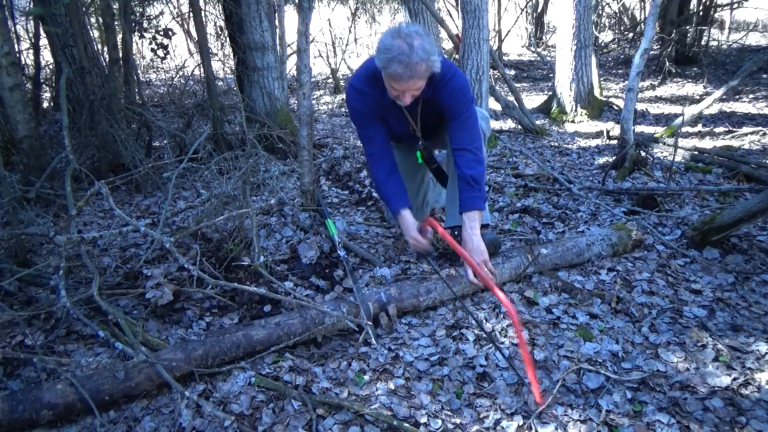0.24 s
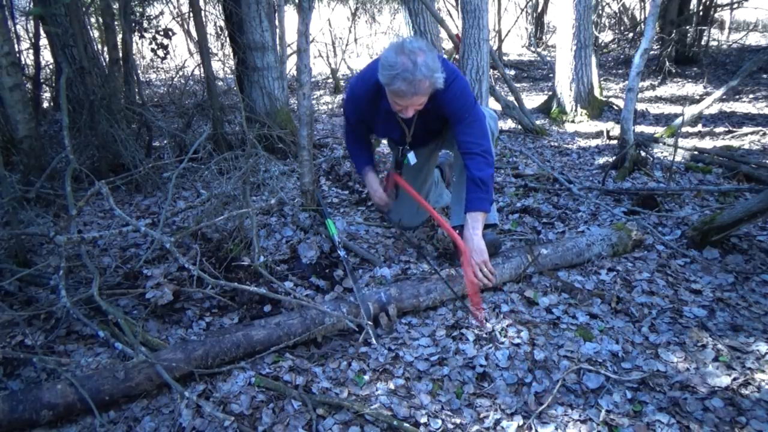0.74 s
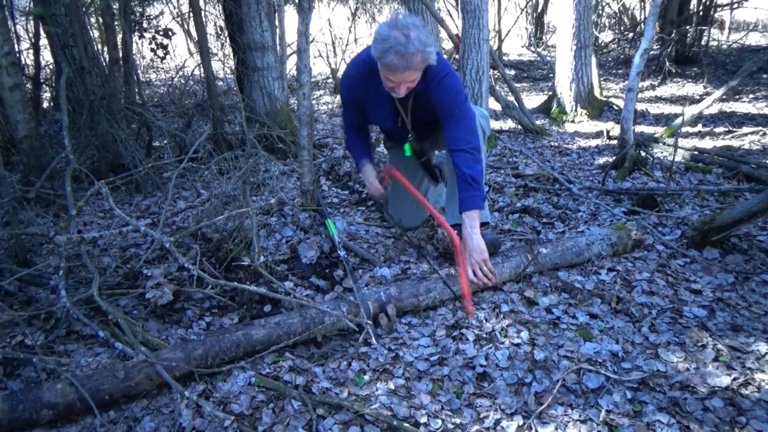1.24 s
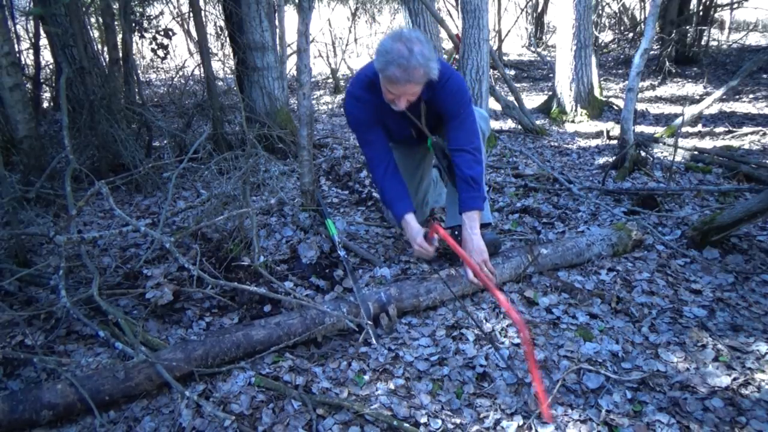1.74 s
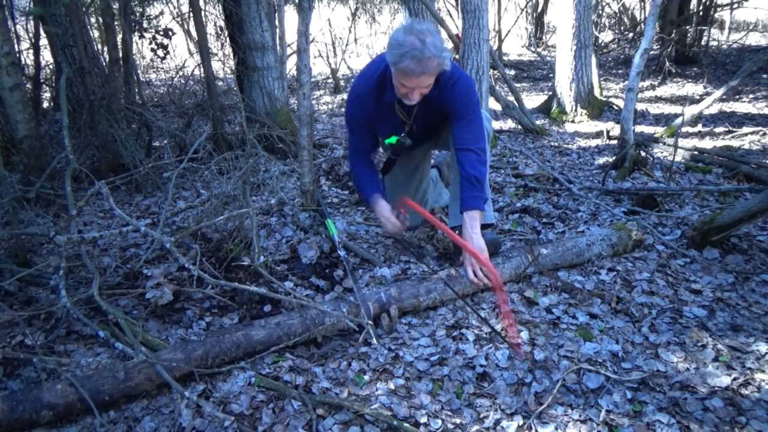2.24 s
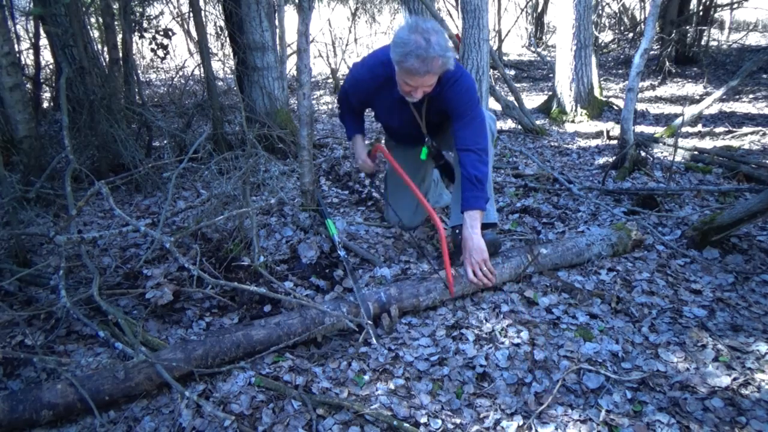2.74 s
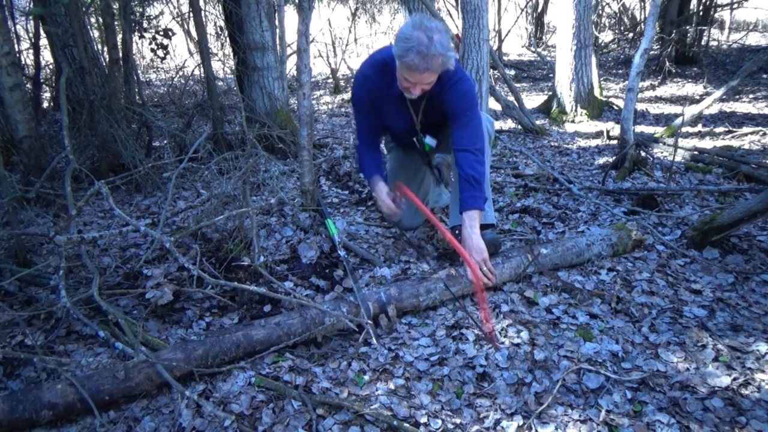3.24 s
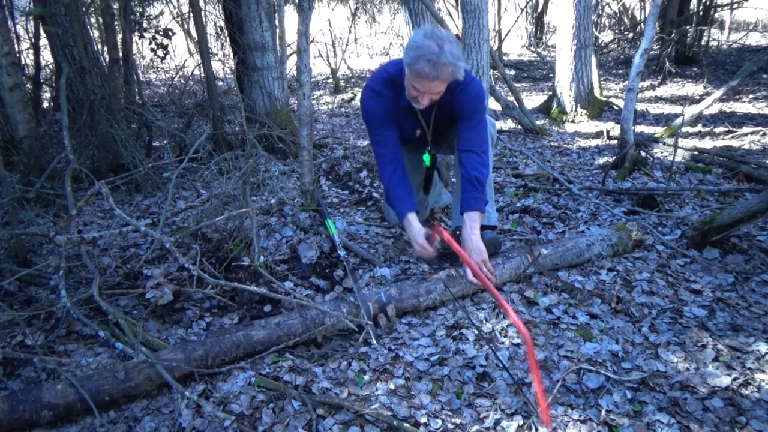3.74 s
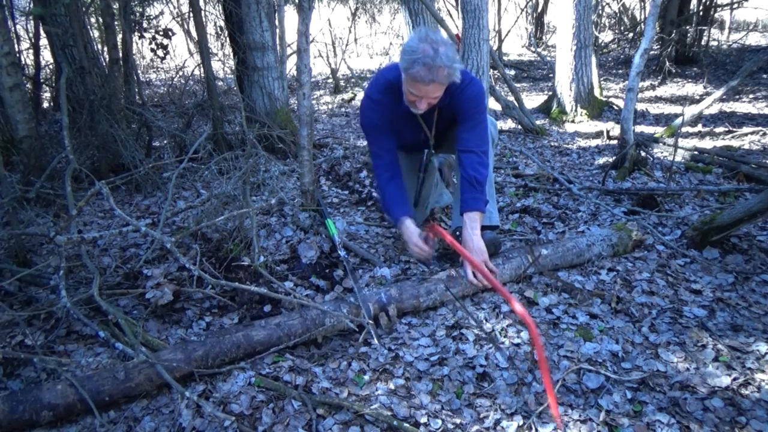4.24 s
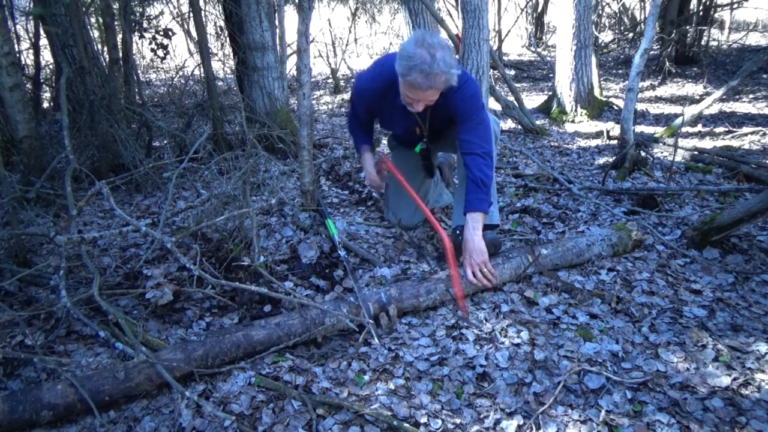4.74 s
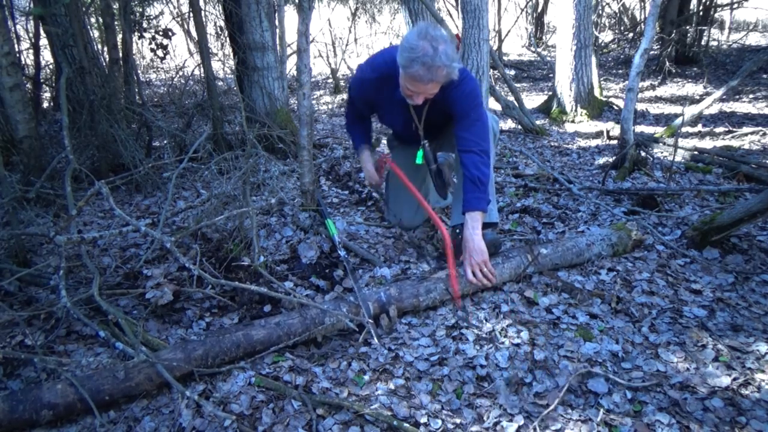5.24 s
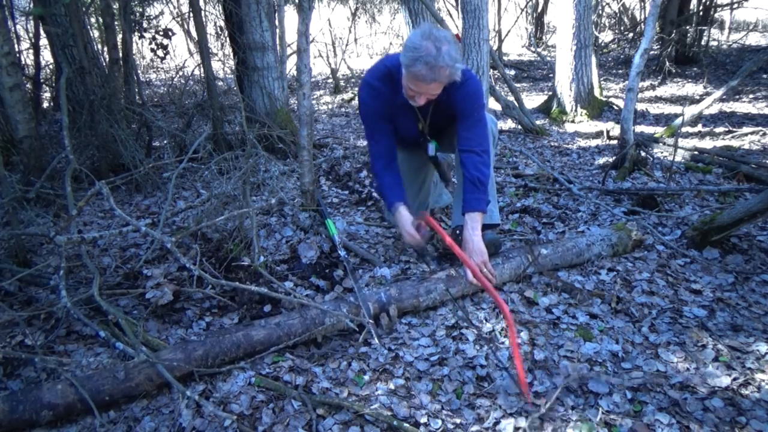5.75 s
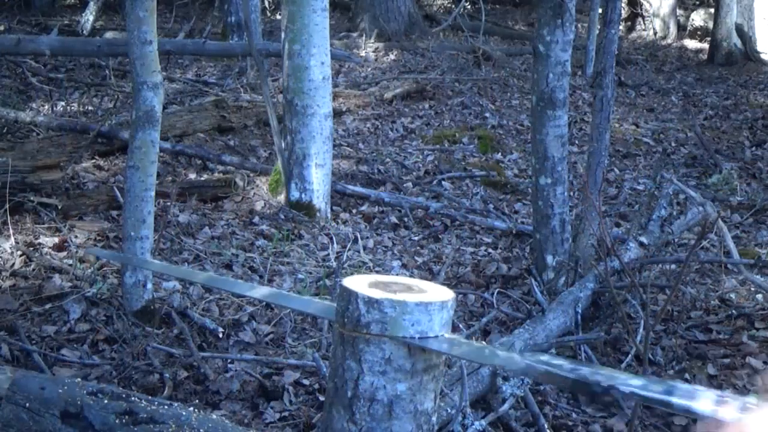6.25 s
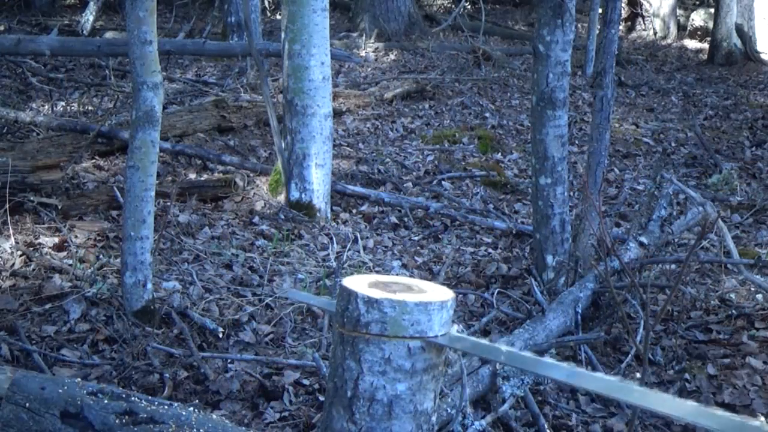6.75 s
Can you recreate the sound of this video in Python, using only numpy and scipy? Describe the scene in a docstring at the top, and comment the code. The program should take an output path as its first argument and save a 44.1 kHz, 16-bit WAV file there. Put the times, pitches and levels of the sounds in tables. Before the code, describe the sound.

Steady raspy sawing of a fallen log outdoors, about three strokes a second, with ringing blade and woody drone, ending on a wide hand saw.

```python
"""Bow saw and hand saw in the woods

On the forest floor a bow saw rasps back and forth through a log: its teeth tear fibres, the log drones
at the tooth rate and the thin blade rings, judders on the way back and snags at the turns.
Near the end it dissolves into a closer, brighter hand saw in a stump. Each body filters noise and tooth beats;
a faint forest hush lies under both, and now and then a blade mode squeals."""
import sys
import numpy as np
from scipy import signal
from scipy.fft import rfft, irfft, next_fast_len
from scipy.io import wavfile
from scipy.ndimage import uniform_filter1d, map_coordinates

SR = 44100
rng = np.random.default_rng(int(sys.argv[2]) if len(sys.argv) > 2 else 0)


def unload_audio(sound):
    """Save the sound as a 16-bit wav file, at the path given as the first command line argument."""
    columns = np.transpose(np.atleast_2d(sound))
    # keep every value between -1 and 1, then stretch to whole-number steps
    steps = np.round(np.clip(columns, -1, 1) * 32767)
    wavfile.write(sys.argv[1], SR, steps.astype(np.int16))


N = 307818  # length in samples
TIME = np.arange(N) / SR  # s
TOP_HZ = 15900  # upper limit of the microphone channel

# Forest hush, relative colour: f/Hz, level/dB per Hz
AIR_COLOUR = [(20, -7.5), (50, -10), (110, 0), (250, -2.5), (600, -10.5), (2000, -18), (8000, -32),
              (16000, -26)]
# Decay of the scatter off trunks and ground: f/Hz, t60/s
WOODS_DECAY = [(100, 0.14), (800, 0.19), (4000, 0.36), (14000, 0.18)]

# Dissolve from bow saw to hand saw: from t/s, to t/s
DISSOLVE = (6.155, 6.27)
# The blade catches and jerks on: centre t/s, swell/dB (negative is a stall), half width/s
JUDDER = [(.525, 3, .007), (1.366, 3, .004), (1.875, 3.5, .016), (1.945, 3.5, 0.011), (1.99, 4.5, 0.0092),
          (2.03, 1.5, .011), (2.611, 2, 0.012), (3.24, 4.5, .012), (3.875, 5, .014), (3.935, 2.5, .014),
          (3.98, 4.5, .009), (4.02, 0.5, .011), (4.525, 4, 0.014), (4.595, 4.5, .013), (4.62, -3.5, .005),
          (4.635, 5, 0.0098), (4.663, 4, 0.0059), (5.167, 3.5, .017), (5.222, 3, .011), (5.268, 2, 0.0074),
          (5.289, -7, 0.0063), (5.32, 4, .009), (5.346, 4, .004), (5.82, 2.5, .013), (5.885, 3.5, 0.017),
          (5.925, 4.5, 0.0095), (6.23, -5.5, 0.0056), (6.31, -5.5, .007), (6.336, -3.5, .005),
          (6.56, -1.5, 0.0063)]
# A blade mode sings briefly: centre t/s, f/Hz, level/dB before trim, half width/s
SQUEALS = [(.04, 6900, -28, 0.061), (1.601, 6800, -39, .04), (3.022, 6850, -27, .006),
           (3.1, 7090, -32, 0.01), (4.94, 3200, -23, 0.011), (5.55, 6780, -30, 0.041),
           (6.259, 4310, -30, 0.038), (6.261, 3000, -35, .02), (6.45, 3000, -30, 0.023),
           (6.51, 3410, -29, 0.027), (6.919, 3380, -40, 0.034)]

# Hand saw, one row per stroke, each until the next row: start t/s, top tooth rate f/Hz, # thrum level/dB, blade
# level/dB before trim, blade level/dB before trim at the turn where the stroke begins
HAND_STROKES = [(6.1, 500, -47, -17, -36), (6.734, 490, -42, -18, -39), (7.17, 490, -46, -17.5, -39)]
# Swell of a stroke, one row for the push and one for the pull (same columns in all three swings):
# crest/share of the stroke, rise power, fall power; a higher power gives a flatter top
HAND_SWING = [(0.58, 4.1, 6.8), (.5, 3, 3)]
# Splinters snapping in the stump's cut: t/s, level/dB before trim
SPLINTERS = [(6.7208, -10), (6.7446, -14), (6.7517, -10.5), (6.758, -11), (6.774, -8)]
# Stump and hand saw, relative colour: f/Hz, level/dB per Hz
STUMP_COLOUR = [(60, -47), (300, -23.5), (800, -24), (1000, -22.5), (1450, -11.5), (2400, -12.5),
                (4000, -9.5), (6000, -5), (8600, -1.5), (9500, 1), (11200, -1.5), (13000, -10),
                (16000, -19)]
# Resonances standing on that colour: f/Hz, width/Hz, lift/dB
HAND_SAW_MODES = [(985, 57, 17.4), (1544, 91, 5.5), (2024, 66, 9.4), (3010, 58, 12.6), (3350, 120, 8.1),
                  (4360, 200, 4), (6140, 160, 4.9), (6960, 170, 6.9), (9530, 320, 2.7)]
# Rattle of the wobbling free blade, relative colour: f/Hz, level/dB per Hz
RATTLE_COLOUR = [(30, -35), (75, -10), (105, -7), (140, -4), (190, -11), (240, -18), (320, -9), (400, -25),
                 (1000, -53)]
# Scatter at the stump that differs between the ears: f/Hz, side over mid level/dB
STUMP_WIDTH = [(150, -41), (500, -16), (1000, -15), (1550, -30), (2000, -17), (4000, -21), (9000, -15.5),
               (14000, -34)]
# Place of the stump between the ears: f/Hz, side over mid gain (+ is left)
STUMP_LEAN = [(150, 0), (1000, -.03), (9000, -0.019)]

# Bow saw, one row per stroke, each until the next row: start t/s, top tooth rate f/Hz, log level/dB, # blade
# level/dB, blade level/dB at the turn where the stroke begins (levels before trim), crest lateness/share of the
# stroke
STROKES = [(-0.23, 441.4, -24, -20, -41.0, 0.023), (0.225, 390.0, -24.5, -22, -43.5, -0.04),
           (0.656, 497, -24, -17.5, -57.5, 0.046), (1.059, 412.0, -23.5, -19.5, -44.5, -0.032),
           (1.426, 481, -22.5, -17, -49.5, -0.038), (1.798, 488, -28, -20.0, -38, -0.014),
           (2.131, 469.0, -23.5, -16.5, -42, 0.0075), (2.49, 385.0, -26, -19.0, -39, 0.0048),
           (2.815, 599, -23.5, -15.5, -46, 0.1), (3.131, 510, -25.5, -18.5, -39, 0.044),
           (3.453, 653, -24.0, -16.0, -43, 0.048), (3.76, 512, -25.5, -19.5, -40, 0.044),
           (4.091, 584.0, -21.5, -16.5, -41.5, -0.05), (4.431, 548, -24.5, -20.5, -34, 0.033),
           (4.739, 564, -23, -17, -39, -0.04), (5.083, 567.4, -25, -20, -29.5, -0.14),
           (5.385, 531, -21.5, -17.5, -40.5, -0.095), (5.748, 491, -25, -20.5, -31, 0.028),
           (6.026, 500.0, -27.5, -23.5, -30, -0.0082), (6.38, 500.0, -25.0, -23.0, -33.0, 0.0)]
# Swell of the log and of the blade, push then pull: crest/share, rise power, fall power
LOG_SWING = [(0.7, 3.07, 1.04), (.45, 2.18, 4.74)]
BLADE_SWING = [(.54, 2.54, 1.9), (.59, 2.44, 4)]
# The teeth bite evenly and the log drones: t/s, drone gain/dB before blending, half width/s, overtone lift/dB
BITES = [(.07, 1, 0.027, 0.5), (.925, 5.5, 0.022, 0), (1.56, -5, 0.012, -6), (1.655, -1, 0.017, 3),
         (2.33, -11, 0.035, 2.5), (2.62, -6, 0.014, -5), (3.0, -2, 0.02, -1.5), (3.659, -4.5, .018, 7),
         (4.251, -5, 0.018, 0), (4.92, -2.5, 0.022, -4.5), (5.27, -5, 0.0098, 0), (5.57, -7.5, 0.011, 2),
         (5.93, -8, 0.0066, 0), (6.2, -11, 0.017, -4)]
# Partials of the unevenly set teeth: multiple of the tooth rate, level/dB before the overtone lift
TOOTH_PARTIALS = [(1, 3), (1.85, -1), (2.8, -8), (3.7, -8)]
# Log, relative colour: f/Hz, level/dB per Hz
LOG_COLOUR = [(41, -44), (70, -26), (130, -14.5), (228, -5), (265, -10), (399, -3.5), (478, -3.5),
              (677, -3.5), (811, -1), (1030, 1.5), (1240, -3.5), (1550, 0.8), (2100, -3), (2600, -8),
              (3380, -37), (5720, -120)]
# Resonances of the log while fibres tear: f/Hz, width/Hz, lift/dB
LOG_MODES = [(234, 23, 3.5), (274.7, 40, -13), (410, 37, 6.5), (485, 40, 1.5), (566, 12, 7.5),
             (618, 22, 6.5), (666, 48, 8), (754, 26, 3), (1012, 12, 6.5), (1180, 70, 2.5), (1333, 57, 7.5),
             (1490, 170, 3)]
# Resonances of the log as it bends: f/Hz, width/Hz, lift/dB
LOG_BENDING = [(410, 340, 2.9), (667, 75, 7.1), (1520, 240, 1.6)]
# The log booms less as the cut deepens: t/s, bass level/dB
BOOM = [(0, 2), (1.3, 3), (2.5, 0.6), (3.6, -2.5), (6.2, -3.5)]
# Bow saw blade, relative colour: f/Hz, level/dB per Hz
BLADE_COLOUR = [(1410, -24.5), (2400, -7), (2640, -8), (3170, -2.5), (3430, -5.5), (5570, -1.5), (6320, -2),
                (6900, -4), (8350, -4), (9480, 1.5), (12400, -8), (15100, -18.5), (16000, -20)]
# Resonances standing on that colour: f/Hz, width/Hz, lift/dB
BLADE_MODES = [(3147, 35, 2.8), (3910, 540, 4.1), (4780, 140, 4.1), (5600, 210, 3.2), (6760, 92, 9.7),
               (7000, 68, 9.1), (7260, 200, 1.8), (7660, 126, 6.7), (9240, 400, 1.2)]
# The deeper cut also damps the blade: t/s, treble level/dB
SHEEN = [(0, 2.5), (2.3, -0.4), (3.8, -0.8), (4.5, -2), (6.2, -0.8)]
# A tooth snags as the saw turns: t/s, scrape level/dB, length/s, ring f/Hz
SNAGS = [(.712, -34.5, .014, 9400), (1.724, -17, 0.0029, 10500), (1.731, -24, 0.0065, 3030),
         (1.757, -18.5, 0.0017, 3620), (1.772, -27, 0.011, 9750), (2.463, -22.5, 0.0043, 2380),
         (2.849, -29.5, 0.01, 9300), (3.194, -40, 0.0092, 3080), (3.413, -21.5, 0.0061, 6820),
         (3.751, -31.5, .009, 9380), (3.786, -31.5, 0.0085, 9400), (4.113, -32, 0.0078, 6940),
         (4.377, -27, 0.0035, 9500), (4.385, -21, .012, 10200), (4.429, -31, 0.0077, 9500),
         (5.027, -20.5, 0.016, 9460), (5.422, -25.5, 0.0076, 6850), (5.672, -21, 0.025, 9530)]
# Scatter at the log that differs between the ears: f/Hz, side over mid level/dB
LOG_WIDTH = [(150, -29), (300, -16), (700, -14), (1000, -14), (1700, -21.5), (3000, -18.5), (3800, -50),
             (6000, -69), (8200, -19), (11000, -55)]
# Place of the log between the ears: f/Hz, side over mid gain (+ is left)
LOG_LEAN = [(150, 0.0071), (300, 0.076), (700, 0.11), (1200, 0.069), (2200, -0.031), (4000, 0), (12000, 0)]

DWELL = 0.02  # share of a stroke for which the saw lingers at either end
THRUM_REST_DB = -51  # the free end of the hand saw at a turn
THRUM_HZ, THRUM_SETTLE_S = 100, 0.1107  # settled pitch, time constant
THRUM_SAG = 0.35  # a stroke starts this share above the settled pitch
LOG_REST_DB = -62  # at a turn the log sinks halfway from the blade's level to this
STEADY_BITE_DB = -19  # drone gain that runs through every stroke, before blending
SLOW_BLADE_DB = -5  # shelf on the lower blade modes as the saw slows to a stop


def amp(db):
    """Decibels to gain."""
    return 10 ** (np.asarray(db) / 20)


def unit(x):
    """Scale to rms 1."""
    return x / np.sqrt(np.mean(x ** 2) + 1e-20)


def along(points, hz):
    """(Hz, value) points read on a log axis."""
    f, value = np.transpose(points)
    return np.interp(np.log(hz + 1), np.log(f + 1), value)


def curves(rows):
    """One value per sample for each column after the time."""
    s, *columns = np.transpose(rows)
    return [np.interp(TIME, s, column) for column in columns]


def wobble(rate):
    """A random curve joining unit-variance knots smoothly, rate knots a second."""
    knots = rng.standard_normal(int(N * rate / SR) + 4)
    return map_coordinates(knots, [TIME * rate / SR])


def swell(s, width):
    """A bell-shaped gain around time s."""
    return np.exp(-np.minimum(((TIME - s) / width) ** 2 / 2, 20))


def shelf(x, db, edge_hz, side):
    """Raise or lower what lies on the low or the high side of the edge."""
    sos = signal.butter(2, edge_hz, side, fs=SR, output="sos")
    part = signal.sosfiltfilt(sos, x)
    return x + (amp(db) - 1) * part


def body(x, spectrum, modes, size=8192):
    """Pass x through the causal, minimum-phase ring of a body with this colour and these resonances."""
    hz = np.fft.rfftfreq(size, 1 / SR)
    # each resonance is a rounded bump on the broad colour
    bumps = sum(lift / (1 + (2 * (hz - f) / width) ** 2) for f, width, lift in modes)
    db = along(spectrum, hz) + bumps
    # folding the cepstrum onto positive times makes the ring causal
    cepstrum = irfft(np.log(amp(db) + 1e-6))
    cepstrum[1:size // 2] *= 2
    cepstrum[size // 2 + 1:] = 0
    ring = irfft(np.exp(rfft(cepstrum)))
    return signal.fftconvolve(x, ring / np.linalg.norm(ring))[:N]


def woods(x, size=256):
    """Two independent scatters from trunks and ground: noise tails that decay at their own rate per band."""
    hz, t, z = signal.stft(rng.standard_normal((2, SR // 3)), SR, nperseg=size)
    decay = amp(-60 * t / along(WOODS_DECAY, hz)[:, None])
    tail = signal.istft(z * decay, SR, nperseg=size)[1]
    return signal.fftconvolve(x[None], tail / np.linalg.norm(tail[0]), axes=1)[:, :N]


def air():
    """The faint, steady hush of the forest: coloured noise and its scatter at each ear."""
    hush = body(rng.standard_normal(N), AIR_COLOUR, []) * amp(1.2 * wobble(5))
    return amp(-48.5) * (hush + amp(-16.5) * woods(hush))


def placed(x, width, lean, wet_db):
    """Stereo image: the source leans by band and its reflections differ between the ears."""
    scatter = woods(x)
    m = next_fast_len(N + SR // 2)
    hz = np.fft.rfftfreq(m, 1 / SR)
    direct_side = rfft(x, m) * along(lean, hz)
    scatter_side = rfft(scatter[0], m) * amp(along(width, hz))
    side = irfft(direct_side + scatter_side, m)[:N]
    mid = x + amp(wet_db) * scatter[1]
    return np.array([mid + side, mid - side])


def position(strokes):
    """For each sample: which stroke is under way, and the share of it that is done."""
    start = np.transpose(strokes)[0]
    progress = np.interp(TIME, start, np.arange(len(start)))
    return progress.astype(int), progress % 1


def teeth(strokes, slip):
    """Count of teeth passed and blade speed 0-1; the arm swings like a pendulum."""
    stroke, done = position(strokes)
    speed = np.sin(np.pi * done ** .85)  # quick to start, slower to stop
    rate = np.transpose(strokes)[1][stroke] * speed * (1 + slip * wobble(273))
    return np.cumsum(rate) / SR, speed


def effort(strokes, swing, crest_db, turn_db, late=0):
    """Level in dB: every stroke lingers at its turn, climbs to a crest and sinks to the next turn."""
    stroke, done = position(strokes)
    crest, rise, fall = np.array(swing)[np.arange(len(strokes)) % 2].T  # push and pull alternate
    crest = np.clip(crest + late, .15, .85)[stroke]
    before = np.clip((crest - done) / (crest - DWELL), 0, 1) ** rise[stroke]
    after = np.clip((done - crest) / (1 - DWELL - crest), 0, 1) ** fall[stroke]
    turn_db = np.broadcast_to(turn_db, len(strokes))
    next_turn_db = np.roll(turn_db, -1)
    at_crest = crest_db[stroke] * (1 - before - after)
    return at_crest + turn_db[stroke] * before + next_turn_db[stroke] * after


def fibres(passed, speed, density, spread_db, gating, dust):
    """Tiny breaks, denser at speed, over a hiss of dust; both swell as each tooth enters."""
    chance = density * (.06 + speed) / SR
    breaks = (rng.random(N) < chance) * rng.choice([-1, 1], N)
    breaks = breaks * amp(spread_db * rng.standard_normal(N))
    tear = unit(breaks / np.sqrt(chance)) + dust * rng.standard_normal(N)
    return unit(tear * np.exp(gating * np.cos(2 * np.pi * passed)))


def patchy(x, depth_db, size=1024):
    """The contact shifts along the blade, so narrow bands come and go."""
    z = signal.stft(x, nperseg=size)[2]
    field = uniform_filter1d(rng.standard_normal(z.shape), size=3, axis=0)  # across frequency
    field = uniform_filter1d(field, size=5, axis=1)  # across time
    return unit(signal.istft(z * amp(depth_db * unit(field)), nperseg=size)[1][:N])


def judder():
    """Gain in dB as the blade catches: each jerk is a swell with a stall on either side, or the reverse."""
    gain_db = np.zeros(N)
    for s, swell_db, width in JUDDER:
        near = np.abs(TIME - s) < .08
        u = ((TIME[near] - s) / width) ** 2
        gain_db[near] += swell_db * (1 - u) * np.exp(-u / 2)
    return gain_db


def tone(hz, waver_hz, count):
    """A mode of rms 1 whose pitch wavers under the rubbing."""
    drift = unit(uniform_filter1d(rng.standard_normal(count), size=120))
    return np.sqrt(2) * np.sin(2 * np.pi * np.cumsum(hz + waver_hz * drift) / SR)


def squeals():
    """Friction locks onto one blade mode, then loses it: a wavering tone in a bell-shaped swell."""
    out = np.zeros(N)
    for s, hz, db, width in SQUEALS:
        near = np.abs(TIME - s) < .15
        out[near] += amp(db - 0.5) * swell(s, width)[near] * tone(hz, 45.4, count=near.sum())
    return out


def splinters(t60):
    """Sharp cracks that die at once: noise with an exponential decay."""
    out, t = np.zeros(N + SR), np.arange(SR // 16) / SR
    for s, db in SPLINTERS:
        out[round(s * SR):][:len(t)] += amp(db - 60 * t / t60) * rng.standard_normal(len(t))
    return out[:N]


def thrum(crest_db, waver, rattle_db):
    """The free end of the hand saw wobbles: a low, wavering note that sags after each turn, and a rattle."""
    stroke, _ = position(HAND_STROKES)
    age = np.maximum(TIME - np.transpose(HAND_STROKES)[0][stroke], 0)
    sag = 1 + THRUM_SAG * np.exp(-age / THRUM_SETTLE_S)
    hz = THRUM_HZ * sag * (1 + waver * wobble(25))
    note = amp(2.5 * wobble(20)) * np.sin(2 * np.pi * np.cumsum(hz) / SR)
    rattle = amp(rattle_db) * unit(body(rng.standard_normal(N), RATTLE_COLOUR, []))
    return amp(effort(HAND_STROKES, HAND_SWING, crest_db, THRUM_REST_DB)) * (note + rattle)


def hand_saw(jerk_db):
    """A wide, free blade close by flutters in the cut, wobbles and rings in a few clear modes."""
    passed, speed = teeth(HAND_STROKES, slip=.05)
    _, _, thrum_db, crest_db, turn_db = np.transpose(HAND_STROKES)
    blade_db = effort(HAND_STROKES, HAND_SWING, crest_db, turn_db)
    flutter_hz = 28 * (1 + 0.26 * wobble(14))
    flutter = np.sin(2 * np.pi * np.cumsum(flutter_hz) / SR)
    tear = fibres(passed, speed, density=5000, spread_db=2.5, gating=0.21, dust=0.93)
    rasp = patchy(tear, depth_db=2.0)
    drive = rasp * amp(blade_db + jerk_db + 1.26 * flutter + 0.5)
    drive = drive + amp(-8.0) * splinters(t60=0.0068)
    drone = amp(-44.5) * swell(6.94, 0.067) * np.sin(2 * np.pi * passed)  # the teeth bite on the second stroke
    low = thrum(thrum_db, waver=.07, rattle_db=-1) + drone
    return placed(body(drive, STUMP_COLOUR, HAND_SAW_MODES) + low, STUMP_WIDTH, STUMP_LEAN, wet_db=-29)


def snags(ring_db):
    """Each snag scrapes for a moment, rings one mode and lets go."""
    out, t = np.zeros(N + SR), np.arange(SR // 16) / SR
    for s, db, length, hz in SNAGS:
        grip = (1 - np.exp(-t / 0.00013)) * np.exp(-(t / length) ** 3)
        scrape = unit(body(rng.standard_normal(len(t)), BLADE_COLOUR, [], size=512)[:len(t)])
        ring = amp(ring_db) * tone(hz, 350, count=len(t))
        out[round(s * SR):][:len(t)] += amp(db) * grip * (scrape + ring)
    return out[:N]


def blade_sound(passed, speed, level_db):
    """The rasp of the teeth sets the thin blade hissing and ringing."""
    tear = fibres(passed, speed, density=6000, spread_db=3.0, gating=0.25, dust=0.68)
    rasp = patchy(tear, depth_db=2.6)
    blade = body(rasp * amp(level_db), BLADE_COLOUR, BLADE_MODES)
    blade = shelf(blade, SLOW_BLADE_DB * (1 - speed), edge_hz=7300, side="low")
    return shelf(blade, curves(SHEEN)[0], edge_hz=9300, side="high")


def drone_of(passed, overtones_db, rough):
    """The regular push of the teeth bends the whole log; no two bites are alike, so every partial is rough."""
    partials = []
    for multiple, db in TOOTH_PARTIALS:
        level = amp(db + 3.6 * wobble(130))
        phase = multiple * (2 * np.pi * passed + rough * wobble(150))
        partials.append(level * np.sin(phase))
    lift = amp(overtones_db)
    push = (partials[0] + lift * sum(partials[1:])) / np.hypot(1, lift)
    return unit(body(push, LOG_COLOUR, LOG_BENDING))


def log_sound(passed, speed):
    """Tearing fibres and the regular push of the teeth drive the log."""
    bite = amp(STEADY_BITE_DB) + sum(amp(db) * swell(s, width) for s, db, width, _ in BITES)
    drone = drone_of(passed, curves(BITES)[-1], rough=.55)
    tear = fibres(passed, speed, density=3400, spread_db=1.7, gating=0.36, dust=0.52)
    tear = body(patchy(tear, depth_db=2.5), LOG_COLOUR, LOG_MODES)
    tear = shelf(tear, curves(BOOM)[0], edge_hz=780, side="low")
    return (tear + bite * drone) / (1 + bite ** 2) ** 0.21  # partly evens out the added level


def bow_saw(jerk_db):
    """Log and blade swell with each stroke, unevenly as the teeth meet harder and softer wood."""
    passed, speed = teeth(STROKES, slip=.07)
    _, _, log_crest_db, blade_crest_db, turn_db, late = np.transpose(STROKES)
    log_db = effort(STROKES, LOG_SWING, log_crest_db, (turn_db + LOG_REST_DB) / 2, late)
    blade_db = effort(STROKES, BLADE_SWING, blade_crest_db, turn_db, late)
    uneven_db = jerk_db + 0.52 * wobble(70)
    log = log_sound(passed, speed) * amp(log_db + uneven_db + 0.9 * wobble(45) - .2)
    blade = blade_sound(passed, speed, blade_db + uneven_db - .7)
    return placed(log + blade + snags(ring_db=-1.5), LOG_WIDTH, LOG_LEAN, wet_db=-21)


def scene():
    """The two saws, joined by an equal-power dissolve, with squeals and forest hush throughout."""
    jerk_db = judder()
    fade = np.interp(TIME, DISSOLVE, [0, np.pi / 2])
    saws = np.cos(fade) * bow_saw(jerk_db) + np.sin(fade) * hand_saw(jerk_db)
    return saws + squeals() + air()


def record(dry):
    """The microphone channel passes nothing above its band limit."""
    m = next_fast_len(N + SR // 2)
    passband = np.fft.rfftfreq(m, 1 / SR) < TOP_HZ
    return irfft(rfft(dry, m) * passband, m)[:, :N]


dry = scene()
out = record(dry)
unload_audio(out)
```